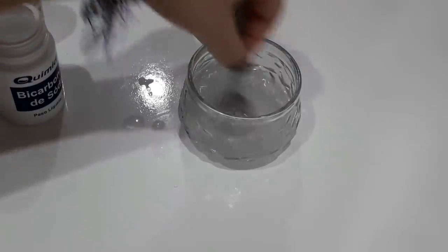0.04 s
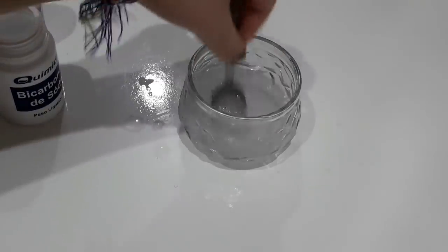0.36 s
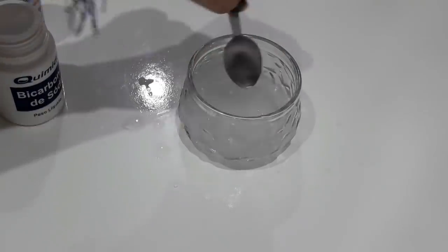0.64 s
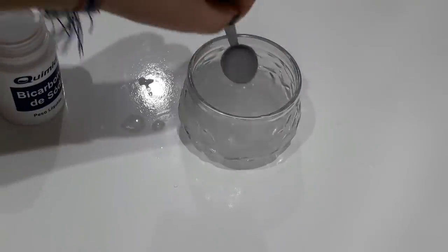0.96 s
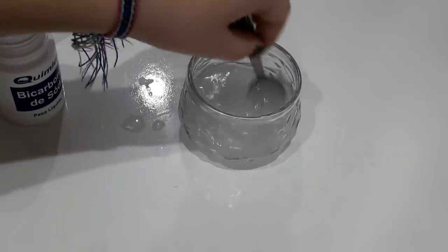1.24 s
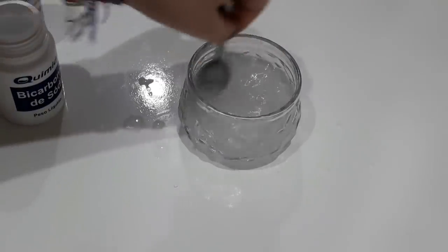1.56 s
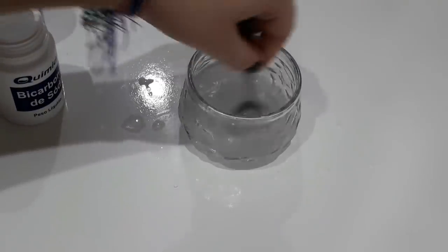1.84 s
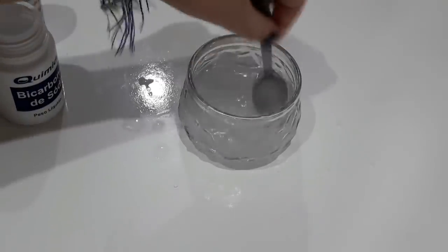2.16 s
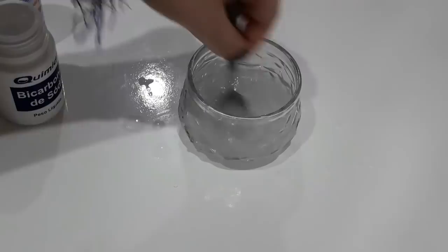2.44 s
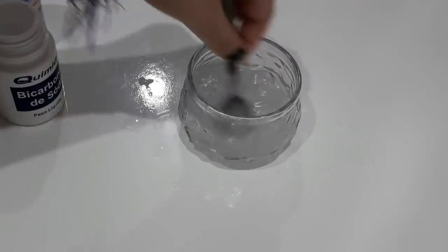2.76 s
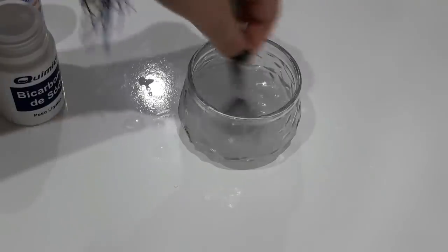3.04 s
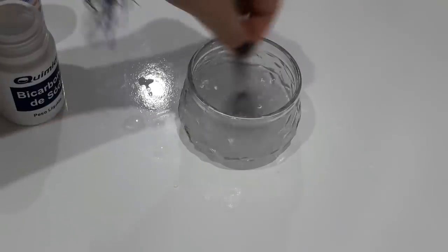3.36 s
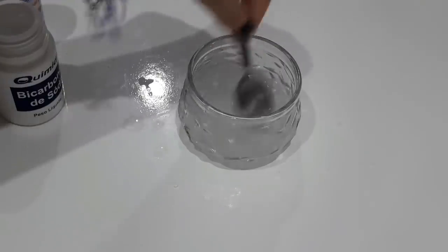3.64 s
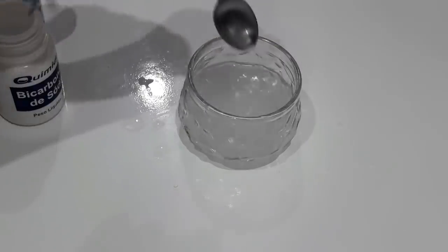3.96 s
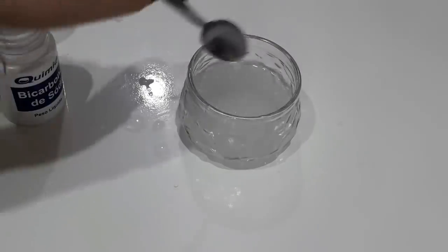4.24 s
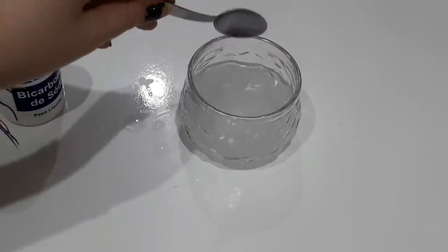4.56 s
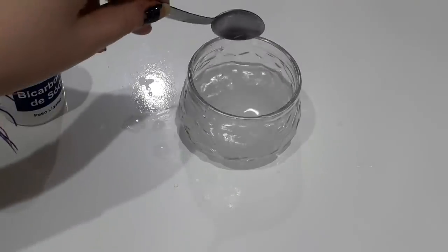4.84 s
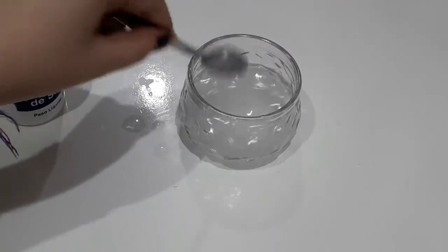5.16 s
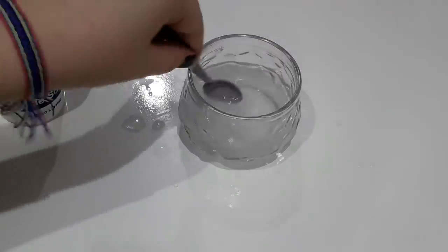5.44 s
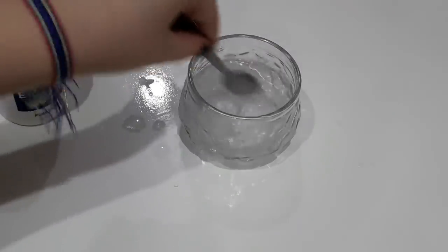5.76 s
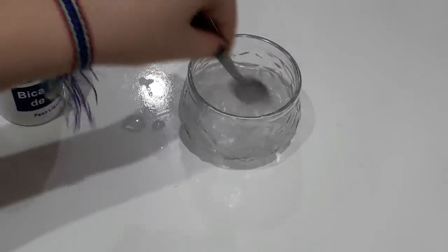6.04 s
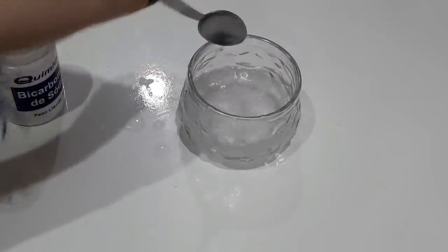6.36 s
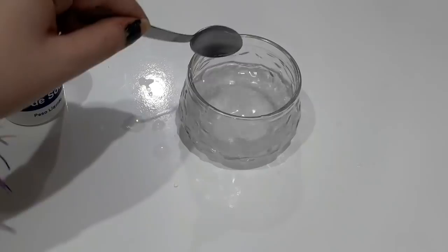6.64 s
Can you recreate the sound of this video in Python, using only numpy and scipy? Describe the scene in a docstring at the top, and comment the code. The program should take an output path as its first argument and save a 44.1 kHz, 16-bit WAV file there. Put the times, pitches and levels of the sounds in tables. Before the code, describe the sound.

Quick spoon clinks on a glass jar of lightly fizzing liquid, pausing for soft cloth swishes, then resuming as a muffled vehicle passes.

```python
"""In a bare room, with a distant engine faint through the walls, a metal spoon stirs a small glass jar.
Each impact excites brief modes that shift with the grip, one lingering, and the table thuds beneath.
The liquid swirls and fizzes, a sleeve swishes by friction, and trapped air gulps among the clinks.
After 3.5 s the spoon rests while the vehicle pulls on in its next gear and the sleeve brushes again.
Near 5.5 s the vehicle passes outside as a last run of clinks sounds."""
import sys
import numpy as np
from scipy import signal
from scipy.fft import rfft, irfft
from scipy.io import wavfile

SR = 44100
rng = np.random.default_rng(int(sys.argv[2]) if len(sys.argv) > 2 else 0)


def wav_out(sig):
    """Save sig, one row per channel (or a flat mono array), as 16-bit PCM at SR to the path in sys.argv[1]."""
    wavfile.write(sys.argv[1], SR, np.round(np.clip(np.atleast_2d(sig).T, -1, 1) * 32767).astype(np.int16))


N = 295470


def gain_of(db):
    """Amplitude ratio of a level in decibels."""
    return 10 ** (np.asarray(db) / 20)


def unit_rms(x):
    """Normalisation to rms 1."""
    return x / np.sqrt(np.mean(x ** 2) + 1e-20)


def at_frequency(points, hz):
    """Interpolation of a table on a logarithmic frequency axis."""
    f, value = np.transpose(points)
    return np.interp(np.log(hz + 1), np.log(f + 1), value)


def follow(rows):
    """Linear interpolation of each column over time, one value a sample."""
    s, *columns = np.transpose(rows)
    return [np.interp(np.arange(N) / SR, s, c) for c in columns]


def add(mix, s, sound):
    """Superposition of a sound on the mix, starting at time s."""
    part = mix[max(round(s * SR), 0):][:len(sound)]
    part += sound[:len(part)]


def coloured(x, colour, size=4096):
    """Minimum-phase filtering by a spectrum of rows (f/Hz, level/dB)."""
    log_gain = np.log(gain_of(at_frequency(colour, abs(np.fft.fftfreq(size, 1 / SR)))))
    taps = np.fft.ifft(np.exp(np.conj(signal.hilbert(log_gain)))).real
    return signal.fftconvolve(x, taps[:size // 2])[:len(x)]


def noise(colour):
    """Stationary Gaussian noise of rms 1, shaped by rows (f/Hz, level/dB)."""
    return unit_rms(coloured(rng.standard_normal(N), colour))


def room_tone(level_db):
    """Stationary background noise: a low rumble under faint hiss."""
    spectrum = [(25, -17), (55, -5), (130, 3), (200, 0), (300, -6), (500, -11), (1200, -13), (1600, -18.5),
                (4000, -18.5), (7700, -23.5), (10700, -24), (16000, -30)]  # noise density: f/Hz, level/dB
    return gain_of(level_db) * noise(spectrum)


def vehicle(closest_s=5.493, distance_over_speed_s=0.87, road_db=-55, road_falloff=3.2, hidden_db_per_s=7):
    """Spherical spreading: engine harmonics swell on approach, tyres roar only close by; walls dull both."""
    gears = [(0, 58, 8), (1.0, 76.4, 1.5), (1.75, 86.8, 2.5), (2.75, 51.84, -1), (3.1, 55.36, 5),
             (3.7, 61.45, -10.5), (4.55, 71.5, 2.5), (5.95, 81.57, -7), (6.7, 68, -20)]  # pull through two gears: t/s, firing f/Hz, throttle level/dB
    orders = [-67.5, -72, -75.5]  # first three engine harmonics: base level/dB
    standing_waves = [(74.7, 3.3, 9.5), (118, 20, 7.5), (141, 15, 7.5), (180, 26, 3.5)]  # room modes they sweep through: f/Hz, bandwidth/Hz, lift/dB
    tyres = [(40, -18.5), (100, -4), (190, 1.5), (300, -1.5), (500, 1), (750, -6.5), (1100, -9.5),
             (2000, -15.5)]  # rolling noise density: f/Hz, level/dB
    walls = [(50, -6.5), (72, 0), (150, 1), (750, -1.5), (1400, -8.5), (2500, -17.5), (5000, -40),
             (10000, -70)]  # transmission indoors: f/Hz, level/dB
    hz, throttle_db = follow(gears)
    past_s = np.arange(N) / SR - closest_s
    nearness = 1 / np.hypot(1, past_s / distance_over_speed_s)
    phase = 2 * np.pi * np.cumsum(hz) / SR
    engine = np.zeros(N)
    for k, db in enumerate(orders, 1):
        lift_db = sum(lift / (1 + (2 * (k * hz - f) / width) ** 2) for f, width, lift in standing_waves)
        waver = 1 + .25 * noise([(1, 0), (8, 0), (25, -25), (100, -80)])
        engine += gain_of(db + throttle_db + lift_db) * np.sqrt(2) * np.sin(k * phase) * waver
    hidden_db = hidden_db_per_s * np.maximum(past_s, 0)
    roar = gain_of(road_db - hidden_db) * nearness ** road_falloff * noise(tyres)
    return coloured(nearness * engine + roar, walls)


def unit_blow(x):
    """Normalisation of a transient to the energy of 8 ms at rms 1."""
    return x * np.sqrt(.008 * SR / np.sum(x ** 2))


def burst(t, colour, fade_s, passes=4):
    """Micro-contacts and scattering: decaying noise, whitened and then coloured."""
    fade = np.exp(-t / fade_s)
    x = rng.standard_normal(len(t)) * fade
    for _ in range(passes):
        flat_spectrum = np.exp(1j * np.angle(rfft(x)))
        x = irfft(flat_spectrum, len(t)) * np.sqrt(fade)
    return unit_blow(coloured(x, colour))


def ring(t, hz, t60, rise_s):
    """Damped oscillation of one mode, which builds up and decays exponentially."""
    return np.sin(2 * np.pi * (hz * t + rng.random())) * gain_of(-60 * t / t60) * (1 - np.exp(-t / rise_s))


def clinks(slosh=.006, split=.012, held_s=0.0076, choke_hz=3000, choke_slope=.3):
    """Impact excitation: the spoon sets jar and table ringing. Returns glass, brief rings and table."""
    # spoon impacts: t/s, contact level/dB, thud, treble and rim level/dB re contact,
    # lingering level/dB, brief rings [(f/Hz, level/dB)], of which the first lingers
    impacts = [(0.0549, -41, -9.5, 1.5, -11, -52, [(3650, -37.5), (2940, -45.5), (4170, -39.5), (4950, -37),
               (5600, -43), (6120, -46)]), (0.083, -38.5, -7, 4, -7.5, -55, [(3330, -26), (3500, -30.5),
               (3080, -39), (1000, -52.5), (700, -49), (2190, -48), (3810, -37.5), (4650, -37.5),
               (5850, -36), (10300, -42)]), (0.0946, -44.5, -17, -3, -25, -60.5, [(3340, -38.5),
               (3840, -41.5), (4160, -44.5), (6040, -49.5), (10070, -42.5)]),
               (1.1248, -41, -7, -6, -12, -56.5, [(2990, -37.5), (3460, -47), (4450, -42.5), (5330, -45.5),
               (7070, -47.5)]), (1.1394, -38, -9.5, -2, -17.5, -51, [(4480, -31.5), (2870, -34),
               (2370, -43.5), (3080, -38), (5030, -39.5), (5520, -41.5), (7150, -44.5)]),
               (1.306, -48.5, -16.5, -9.5, -24, -53, [(4710, -47), (2440, -47.5), (3260, -54),
               (5200, -50)]), (1.4291, -40.5, -9.5, 2, 0, -52, [(5130, -30.5), (1962, -38.5), (2330, -39.5),
               (2530, -32.5), (2920, -43), (1180, -50.5), (3440, -38.5), (4100, -43), (5890, -39),
               (9340, -38.5)]), (1.715, -46.5, -12.5, -14.5, -19, -64, [(5030, -59.5), (1980, -58.5),
               (2150, -51), (2780, -52), (3370, -66), (5460, -50)]),
               (1.8304, -49.5, -7, -8.5, -26, -50, [(5090, -49.5), (1990, -50), (2400, -43.5),
               (3290, -46.5), (6680, -51), (7720, -50.5)]), (2.05, -35.5, -13, -6, -17, -44, [(2410, -31.5),
               (1420, -47), (2000, -39.5), (2930, -40), (3400, -46), (5790, -37.5), (6350, -44.5)]),
               (2.1075, -45.5, -15, -12, -30, -60, [(2260, -46), (4200, -57)]),
               (2.212, -47, -7.5, -12, -34, -61, [(2240, -42), (1480, -47.5), (1920, -51), (2600, -48),
               (2910, -50), (3700, -54), (5130, -53)]), (2.2322, -57.5, -28, -2, -28, -66, [(1890, -65),
               (3470, -61), (4190, -65), (4870, -56)]), (2.451, -38.5, -14, -16, -23, -42, [(1773, -41),
               (1420, -45.5), (2130, -46), (2900, -43), (3350, -42), (3750, -44), (4030, -49.5)]),
               (2.5858, -54.5, -23, -10, -34, -51.5, [(1730, -53.5), (2380, -58.5), (3410, -58.5),
               (3690, -54.5)]), (2.7506, -41, -20.5, -9, -13, -44, [(2260, -35.5), (1450, -49.5),
               (1720, -42.5), (3090, -46), (3260, -44), (5650, -62), (7240, -54)]),
               (2.835, -65, -23, -9, -22.5, -60, [(1500, -54), (1710, -58)]),
               (2.9895, -30, -18.5, -6, -20.5, -41, [(2975, -32.5), (870, -55), (1710, -36.5), (3820, -39),
               (4000, -40), (5940, -38), (7050, -33.5)]), (3.234, -66.5, -57, -3, -28, -82, [(3350, -63)]),
               (3.3023, -65, -36, -2.5, -28, -64, [(2150, -60), (1506, -63)]),
               (3.3616, -51, -18.5, -6.5, -7, -62, [(2077, -46), (1490, -51), (3050, -49.5), (5800, -54.5),
               (10360, -59), (10900, -56)]), (3.526, -34.5, -14, -5.5, -16.5, -56, [(1908, -40.5),
               (1500, -45), (2270, -37.5), (2890, -45), (5200, -43.5), (5860, -44), (6900, -44.5)]),
               (5.3684, -42.5, -7, -10, -24, -41, [(5450, -48), (1470, -49), (1860, -54), (7394, -54),
               (2550, -48.5), (3160, -44.5), (6120, -47.5)]), (5.491, -46, -15, -6, -14, -43, [(5230, -48),
               (2800, -54), (6000, -57), (7580, -61), (9200, -58)]),
               (5.512, -55, 2, -2, -25, -49, [(5120, -56), (1930, -54.5), (3000, -60), (10700, -56)]),
               (5.8253, -86, -15.5, 5, -20, -65, [(3270, -69.5)]),
               (5.8445, -82, -15, 5, -23, -78, [(3360, -80)]),
               (5.963, -47.5, -5, -1, -14, -51, [(4560, -44), (3110, -45.5), (1490, -55), (1790, -63),
               (4120, -51), (4900, -52), (6020, -52.5)])]
    jar_modes = [(1440, -19.5, .15), (1745, -24, .15), (2120, -25, .1), (3230, -22, .18), (3470, -23, .18),
                 (4120, -24, .12), (5080, -23, .15), (5450, -21, .15), (5760, -22, .1), (6150, -26, .12),
                 (7180, -14, .02)]  # excited by every blow: f/Hz, level/dB, t60/s
    contact_colour = [(500, -25.5), (900, -22.5), (1150, -9.5), (1430, 1.5), (2200, -1.5), (3500, 1),
                      (5000, -3), (6100, -2), (7200, -15.5), (10000, -26.5)]  # spectrum of metal on glass: f/Hz, level/dB
    treble_colour = [(5000, -18.5), (6600, -1.5), (7600, 1), (8700, -7), (10100, 2), (11300, -1),
                     (12500, -6.5), (16000, -13.5)]  # its bright edge as heard: f/Hz, level/dB
    thud_colour = [(30, -24), (100, -8), (220, -7), (320, -1.5), (410, 6.5), (500, -4), (700, -7),
                   (1000, -15), (2000, -23)]  # spectrum of the table's thud: f/Hz, level/dB
    t = np.arange(24000) / SR
    glass, tones, table = np.zeros((3, N))
    for s, db, thud_db, treble_db, rim_db, linger_db, rings in impacts:
        offset, drift = rng.uniform(-1.2, 1, 2)
        bend = 1 + slosh * (offset + drift * t / .15)  # moving liquid bends the pitch of the glass
        rim_hz = 1954 * bend * (1 + slosh * (t / .1 - .6) * np.sign(drift))
        strike = gain_of(-1) * burst(t, contact_colour, fade_s=0.0077)
        strike += gain_of(treble_db - 1) * burst(t, treble_colour, fade_s=0.0062)
        for hz, mode_db, t60 in jar_modes:
            strike += gain_of(mode_db - 2) * ring(t, hz * bend, t60, rise_s=0.00047)
        strike += gain_of(rim_db + .5) * ring(t, rim_hz, t60=.27, rise_s=.001)
        add(glass, s, gain_of(db) * strike)
        pair_hz = rings[0][0] * (1 + split * rng.uniform([-1, 0], [0, 1]))  # two close modes beat
        beating = sum(ring(t, hz * bend, t60=.09, rise_s=.003) for hz in pair_hz)
        add(glass, s, gain_of(linger_db - 6) * beating)
        for hz, mode_db in rings:  # the spoon presses on and chokes these, high ones sooner
            choke = np.exp(-(t / held_s * max(hz / choke_hz, 1) ** choke_slope) ** 3)
            add(tones, s, gain_of(mode_db) * unit_blow(choke * ring(t, hz, t60=0.028, rise_s=0.00042)))
        add(table, s, gain_of(db + thud_db) * burst(t, thud_colour, fade_s=0.009))
        for hz in rng.uniform([300, 385, 410], [385, 410, 480]):  # the top booms differently at each push
            add(table, s + .004, gain_of(db + thud_db - 18) * ring(t, hz, t60=.27, rise_s=.008))
    return glass, tones, table


def swell(middle_s, length_s):
    """Gaussian envelope of one movement."""
    return np.exp(-(2 * (np.arange(N) / SR - middle_s) / length_s) ** 2)


def stirring():
    """Amplitude envelope of the stirring: the sum of its strokes."""
    strokes = [(.28, .2, -12), (1.36, .22, 0), (1.62, .14, 3), (1.83, .18, -2), (2.29, .12, -1),
               (2.6, .14, 0), (2.85, .12, -3), (3.22, .09, 4), (3.47, .33, 1), (5.31, .2, 2),
               (5.58, .18, -1), (5.84, .12, -2)]  # spoon through liquid and along the wall: middle t/s, length/s, level/dB
    return sum(gain_of(db) * swell(s, length) for s, length, db in strokes)


def swirl(level_db=-70, grains_per_s=1400):
    """Shot noise of fine scrapes and tiny splashes, as strong as the stroke."""
    # the swirl as heard: f/Hz, level/dB
    colour = [(150, -9), (400, -11.5), (1000, -10), (1600, -7), (3300, -3), (6000, -6), (8500, -13),
              (10300, -4), (16000, -23)]
    sizes = gain_of(3 * np.minimum(rng.exponential(1, N), 4)) * rng.choice([-1, 1], N)
    grains = sizes * (rng.random(N) < grains_per_s / SR)
    return gain_of(level_db) * stirring() * unit_rms(coloured(grains, colour))


def fizz(fresh_db=-86.5, settle_s=0.14, pops_per_s=6000):
    """Shot noise of tiny bubbles bursting in uneven spurts, stronger after each stroke."""
    own_fizz = [(0, -99), (.7, -89), (1.6, -80), (2.4, -89), (3.8, -77.5), (4.5, -80), (5.4, -73),
                (6.15, -85), (6.7, -90)]  # the liquid's own fizzing: t/s, level/dB
    # thin high hiss, with the microphone's peak near 10.5 kHz: f/Hz, level/dB
    colour = [(1500, -35), (3500, -13), (7000, -12), (9000, -12), (10200, 0), (11000, -1), (12200, -8),
              (16000, -17)]
    own_db, = follow(own_fizz)
    survival = np.exp(-1 / (settle_s * SR))
    freed = signal.lfilter([1 - survival], [1, -survival], stirring() ** 2)  # freed bubbles soon burst
    envelope = np.hypot(gain_of(own_db), gain_of(fresh_db) * np.sqrt(freed))
    spurts_db = 2 * noise([(1, 0), (12, 0), (40, -25), (150, -80)])
    pops = rng.standard_normal(N) * (rng.random(N) < pops_per_s / SR)
    return envelope * gain_of(spurts_db) * unit_rms(coloured(pops, colour))


def sleeve(catches_per_s=12000, grain_db=2, wet_db=-3):
    """Stick-slip friction: threads catch and release as the arm moves, and the room reverberates."""
    swishes = [(.66, .15, -88, -85), (0.963, 0.13, -67.5, -65), (1.053, 0.11, -75, -69),
               (3.894, 0.13, -68, -68.5), (4.02, .1, -77, -75), (4.27, .12, -78.5, -82.5),
               (4.85, 0.15, -66, -61.5), (4.996, 0.17, -66.5, -60.5), (5.29, 0.18, -71.5, -73.5),
               (5.65, .08, -73, -88), (5.865, .11, -73.5, -96), (6.39, .12, -76, -80.5)]  # arm movements: middle t/s, length/s, hiss level/dB, rub level/dB
    # high hiss of the swish, with the microphone's peak near 10.5 kHz: f/Hz, level/dB
    hiss_colour = [(6000, -32.5), (9000, -10.5), (10300, 3.5), (11300, -2.5), (12300, -9.5), (14500, -19),
                   (16000, -11.5)]
    rub_colour = [(300, -18), (900, -4.5), (1800, -10), (2400, -4), (4000, 0), (6000, -1.5), (8500, -8),
                  (12000, -22)]  # broad rub of the cloth: f/Hz, level/dB
    catches = rng.standard_normal(N) * (rng.random(N) < catches_per_s / SR)
    catches *= gain_of(grain_db * noise([(1, 3), (40, -1), (120, -31.5), (400, -80)]))
    hiss = unit_rms(coloured(catches, hiss_colour))
    rub = unit_rms(coloured(catches, rub_colour))
    cloth = sum(swell(s, length) * (gain_of(hiss_db) * hiss + gain_of(rub_db) * rub)
                for s, length, hiss_db, rub_db in swishes)
    return cloth + gain_of(wet_db) * room(cloth)


def gulps(glide=4.5):
    """Bubble resonance: air pockets closing behind the spoon ring with a rising pitch."""
    pockets = [(1.403, 336, -42.5), (1.866, 422, -44.5), (2.567, 430, -44), (5.525, 502, -47),
               (5.554, 224, -39), (5.56, 464, -36), (5.595, 573, -38.5)]  # trapped air: t/s, starting f/Hz, level/dB
    t, out = np.arange(6000) / SR, np.zeros(N)
    for s, hz, db in pockets:
        add(out, s, gain_of(db) * ring(t, hz * (1 + glide * t), t60=0.025, rise_s=0.0024))
    return out


def room(x, gap_s=0.0045, reflections_per_s=5000, size=256):
    """Reverberation: dense reflections of random sign, each band decaying at its own rate."""
    decay_times = [(150, 0.66), (450, 0.41), (1400, 0.42), (3600, 0.41), (6000, 0.39), (10000, 0.34),
                   (16000, 0.14)]  # reverberation time: f/Hz, t60/s
    t = np.arange(SR * 3 // 4) / SR
    taps = rng.choice([-1., 1.], len(t)) * (rng.random(len(t)) < reflections_per_s / SR) * (t > gap_s)
    hz, frame_s, bands = signal.stft(taps, SR, nperseg=size)
    decay = gain_of(-60 * frame_s / at_frequency(decay_times, hz)[:, None])
    _, tail = signal.istft(bands * decay, SR, nperseg=size)
    return signal.fftconvolve(x, tail / np.linalg.norm(tail))[:N]


def scene(wet_db=-4, tones_wet_db=-5.5, table_wet_db=1, width_db=-41, floor_db=-72.5):
    """Direct and reverberant sound add, almost in mono; the table feeds the room more than the glass."""
    ring_spread = [(1500, 2.5), (2400, -3.5), (3400, -3.5), (5000, -1), (7200, -9.5), (10000, -11)]  # radiation of the brief rings into the room: f/Hz, level/dB
    thud_spread = [(250, 1), (480, 1), (850, 4.5), (1500, 1)]  # radiation of the table into the room: f/Hz, level/dB
    glass, tones, table = clinks()
    jar = glass + swirl() + gulps()
    radiated = gain_of(wet_db) * jar + gain_of(tones_wet_db) * coloured(tones, ring_spread)
    radiated += gain_of(table_wet_db) * coloured(table, thud_spread)
    mid = jar + tones + table + room(radiated) + fizz() + sleeve() + vehicle() + room_tone(floor_db)
    side = gain_of(width_db) * room(mid)
    side += gain_of(floor_db - 11.5) * noise([(25, -7), (300, -13), (2000, -14), (16000, -14)])
    return np.array([mid + side, mid - side])


def record(dry):
    """Band limiting: a linear-phase low-pass filter at 16 kHz."""
    low_pass = signal.firwin(401, 16000, window=("kaiser", 8), fs=SR)
    return signal.oaconvolve(dry, low_pass[None], "same")


dry = scene()
out = record(dry)
wav_out(out)
```